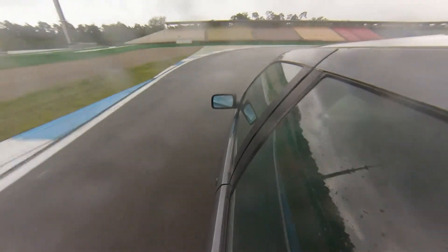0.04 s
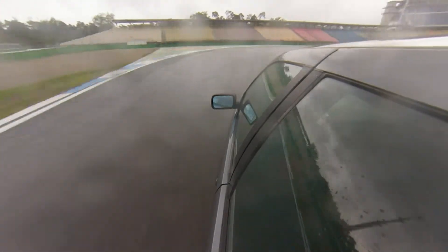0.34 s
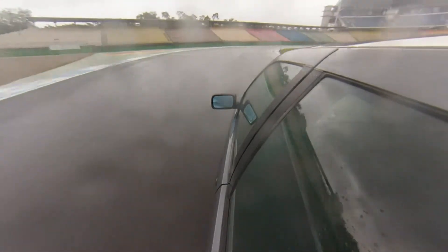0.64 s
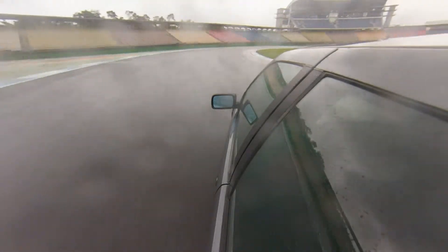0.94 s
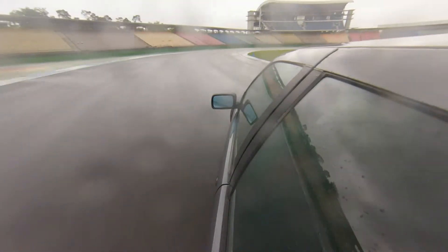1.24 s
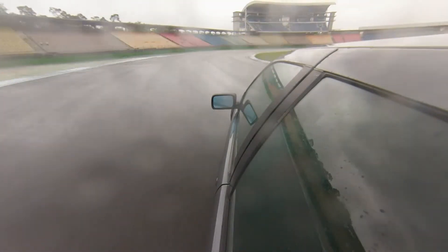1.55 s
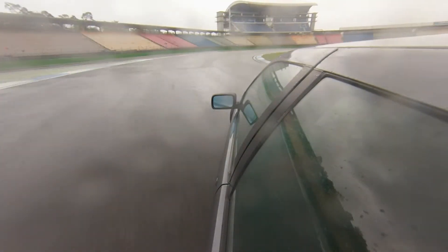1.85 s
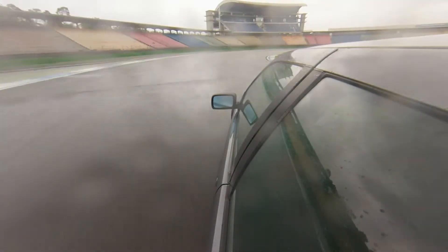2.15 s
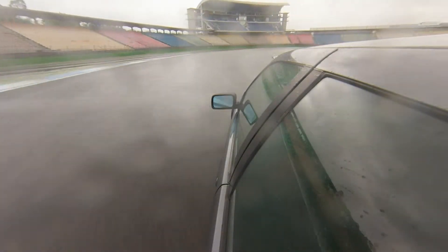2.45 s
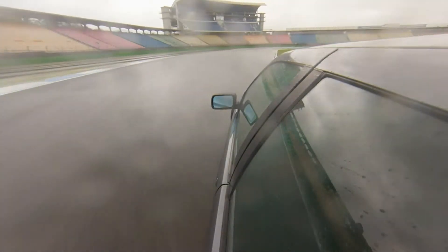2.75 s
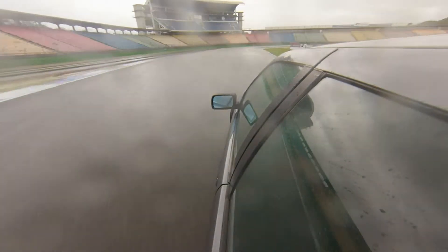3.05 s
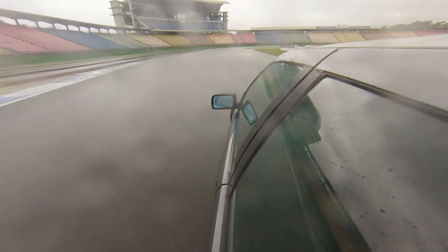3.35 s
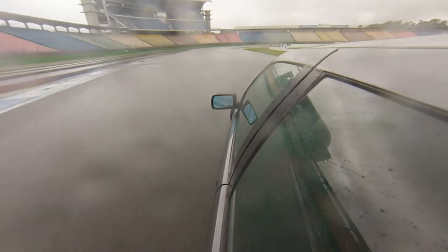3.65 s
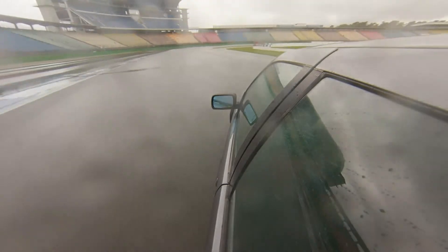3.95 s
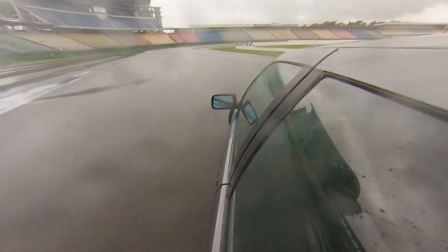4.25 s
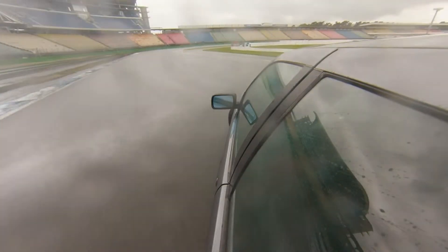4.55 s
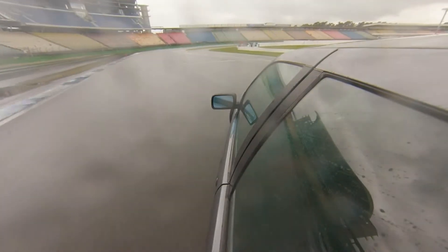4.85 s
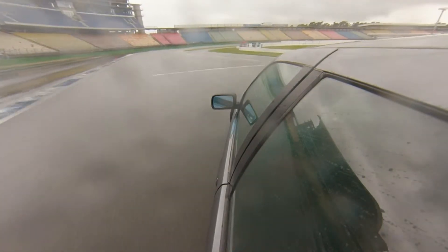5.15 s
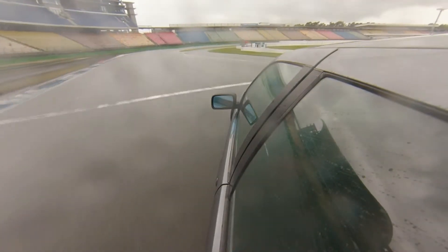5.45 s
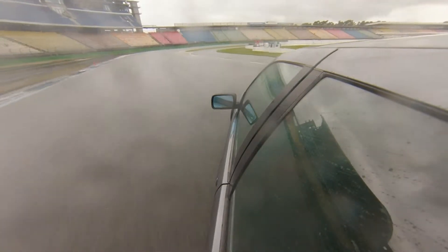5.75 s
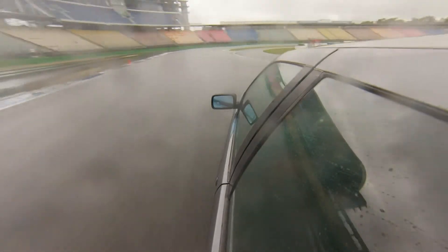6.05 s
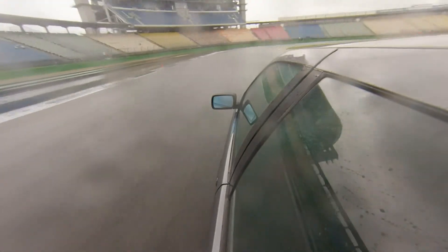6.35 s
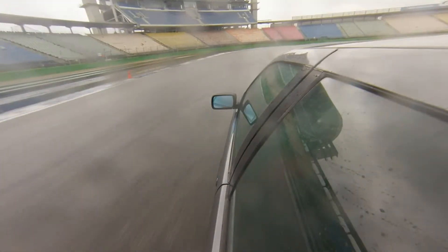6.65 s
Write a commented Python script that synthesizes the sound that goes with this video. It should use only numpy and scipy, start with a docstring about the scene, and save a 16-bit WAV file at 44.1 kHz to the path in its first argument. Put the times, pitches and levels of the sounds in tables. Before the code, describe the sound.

A car slides round a wet racetrack, heard from its outside flank, where heavy wind dominates with a low flutter and repeated rushing gusts. The engine runs hard at a nearly steady pitch underneath, joined within the first second by uneven tyre scrub. Fine spray and sharp little water ticks sit on top. The scrub stops late on, followed by one brief squeal as the engine swells again.

```python
"""Wind throbs and rushes over a small case mounted on the flank of a car drifting round a wet track.
Eddies shed by the mount make the deep throb, which breaks up whenever a gust rises. One airflow,
a stream with gusts on top, drives the rumble, the rush through the housing and the hiss of spray.
Underneath, the engine is held at high revs, the tyres stick and slip into a scrub and a late squeal,
and drops tick on the case."""
import sys
import numpy as np
from scipy import signal
from scipy.fft import rfft, irfft, next_fast_len
from scipy.io import wavfile
from scipy.ndimage import uniform_filter1d

SR = 44100
rng = np.random.default_rng(int(sys.argv[2]) if len(sys.argv) > 2 else 0)


def wav_out(sig):
    """Save sig, one row per channel (or a flat mono array), as 16-bit PCM at SR to the path in sys.argv[1]."""
    wavfile.write(sys.argv[1], SR, np.round(np.clip(np.atleast_2d(sig).T, -1, 1) * 32767).astype(np.int16))


N = 300321

# Table levels are relative: the layers add their own gain.
# stream over the housing, strong while the car is sideways: t/s, level/dB
AIR_STREAM = [(0.0, -61.5), (0.3, -53), (0.55, -47), (0.75, -44), (3.9, -40.5), (4.05, -44.5), (4.5, -46),
              (4.85, -40.8), (5.85, -46), (6.0, -48.5), (6.5, -53), (6.81, -42)]
# gusts on top of the stream: peak t/s, level/dB, rise/s, fall/s, extra bass/dB
AIR_GUSTS = [(0.119, -47.5, 0.095, 0.088, 3.5), (0.826, -33, 0.089, 0.087, -1.5),
             (1.153, -39.5, 0.2, 0.14, -3), (1.577, -36.5, 0.12, 0.016, -1.5),
             (1.932, -30.5, 0.15, 0.014, -1), (2.25, -35.5, 0.123, 0.025, 1), (2.514, -32, 0.11, 0.012, 0),
             (2.64, -37, 0.088, 0.014, 0.5), (2.797, -39, 0.069, 0.022, -0.9),
             (3.058, -34.5, 0.086, 0.028, 0), (3.469, -33, 0.13, 0.03, 0.2), (3.605, -33, 0.049, 0.053, -1),
             (3.83, -42.5, 0.054, 0.099, 3.5), (4.19, -42, 0.069, 0.17, 0.5), (4.6, -38, 0.045, 0.091, 3),
             (4.745, -32.5, 0.095, 0.033, 3.5), (5.051, -32.9, 0.08, 0.088, 0.5),
             (5.272, -35.5, 0.041, 0.158, -1.5), (5.593, -33, 0.055, 0.087, -1.5),
             (5.881, -37, 0.044, 0.026, 2.5), (6.371, -46.5, 0.063, 0.0089, 6),
             (6.811, -41, 0.058, 0.14, 3.5)]
# rate at which eddies peel off the mount: t/s, f/Hz
EDDY_RATE = [(0, 36.15), (.7, 38.87), (.95, 36.65), (1.6, 37.86), (2.25, 40.2), (2.6, 37), (3.1, 36),
             (3.55, 39.16), (4.1, 37.5), (4.4, 38.43), (4.85, 37.2), (5.2, 33.47), (5.4, 35.44),
             (5.65, 39.86), (5.9, 39.6), (6.15, 36.92), (6.81, 34.77)]
# spectrum of the deep turbulence: f/Hz, level/dB
RUMBLE_SPECTRUM = [(25, -7), (45, -2.5), (65, 0), (82, -3), (103, -1), (125, -3.5), (150, -6), (185, -17.5),
                   (260, -23.5), (400, -37.5)]
# spectrum of gusts roaring against the case: f/Hz, level/dB
ROAR_SPECTRUM = [(150, 0), (220, 2.5), (290, -0.5), (380, -6.5), (460, -1), (540, -10.5), (700, -11.5),
                 (950, -9.5), (1400, -15.5), (2200, -22)]
# spectrum of the spray's hiss: f/Hz, level/dB
HISS_SPECTRUM = [(2500, -6), (4000, -13), (5600, -3.5), (6500, 2.5), (7600, -4), (8900, -9.5), (9800, -4.5),
                 (10400, -9.5), (11300, -4.5), (13000, -14), (15500, -39)]
# spectrum of air rushing through the housing: f/Hz, level/dB
RUSH_SPECTRUM = [(300, -4), (600, -9), (900, -5), (1500, -3.5), (2500, -2.5), (3100, -11.5), (4200, -10),
                 (5600, -19.5), (9000, -30)]
# air resonances of the housing: f/Hz, width/Hz, level/dB
HOUSING_MODES = [(455.6, 33, 2), (955, 120, -6), (1232, 120, -1), (1462, 396, 0), (2080, 470, -5.5),
                 (2426, 400, -2), (3526, 330, -10.5), (5010, 274, -6)]
# spectrum of the air at each microphone port: f/Hz, level/dB
PORT_SPECTRUM = [(40, -15), (130, -11.5), (300, -2), (700, -5.5), (1100, -24.5), (2500, -27), (7000, -21),
                 (15000, -27.5)]
# mount resonances that the road keeps humming: f/Hz, width/Hz, level/dB
MOUNT_MODES = [(463, 8.2, -55.5), (2320, 880, -55.5), (5040, 240, -58.5)]
# engine on the throttle through the slide, lifted, then opened again: t/s, firing f/Hz, level/dB
ENGINE_REVS = [(0, 141.4, -46), (.45, 134.2, -38.5), (.8, 140.1, -33.5), (1.3, 150, -40),
               (1.55, 143.1, -32), (2.25, 146.9, -28.5), (2.6, 139, -31.5), (3.1, 145.7, -40.5),
               (3.5, 152, -32), (3.9, 147.5, -30.5), (4.1, 144, -42), (4.5, 141.2, -37.5),
               (4.7, 139.8, -34), (5.65, 149.4, -34.5), (6.05, 136.7, -45), (6.3, 140.1, -39),
               (6.6, 149, -31.5), (6.81, 144.2, -26.5)]
# handfuls of spray thrown at the case: start t/s, length/s, level/dB
SPRAY_SPATTERS = [(.03, .06, -47), (5.898, .04, -43), (6.031, 0.074, -39.5), (6.291, 0.033, -46),
                  (6.413, 0.017, -49)]
# modes of the case under a drop: f/Hz, level/dB, t60/s
CASE_MODES = [(4650, -11, 0.019), (6440, -11.5, 0.0084), (7740, -12.5, 0.0077), (9500, -22, 0.0081),
              (10880, -8.5, 0.003), (12000, -16, 0.0058)]
# air buffeting the flank while the car runs straighter: start t/s, length/s, starting f/Hz, level/dB
SIDE_BUFFETS = [(0.141, 0.28, 54.9, -16), (6.33, 0.133, 58.4, -18)]
# single drops hitting the case: t/s, level/dB, ring f/Hz
DROP_HITS = [(0.2798, -42, 6370), (0.7635, -22.5, 5100), (1.27, -34, 6630), (1.6833, -32, 6290),
             (2.0771, -33, 4060), (2.2498, -28.5, 4070), (2.3347, -32.5, 6230), (2.5083, -36, 6850),
             (3.4158, -23, 6240), (3.7173, -36.5, 6670), (4.8465, -37, 6690), (5.3675, -27, 7260),
             (5.8804, -29, 5900), (6.126, -28.5, 4950), (6.221, -44, 6130), (6.311, -43, 6600),
             (6.4653, -48, 6370), (6.71, -41, 12970)]
# sliding rear tyres: t/s, stick-slip f/Hz, level/dB
TYRE_SCRUB = [(.3, 1238, -63), (.48, 1304, -40), (.7, 1284, -44.5), (.83, 1288, -29), (.95, 1330, -38.5),
              (1.12, 1322, -30), (1.3, 1390, -38.5), (1.5, 1430, -37), (1.9, 1408, -45), (2.2, 1427, -34.5),
              (2.5, 1446, -33.5), (2.9, 1421, -41), (3.4, 1462, -32.5), (4.0, 1448, -44),
              (4.7, 1427, -37.5), (5.9, 1450, -39.5), (6.05, 1432, -70)]
# one tyre finds grip and sings: t/s, f/Hz, level/dB
TYRE_SQUEAL = [(6.25, 1096, -57), (6.31, 1112, -51), (6.37, 1151, -41), (6.45, 1230, -50),
               (6.53, 1255, -48), (6.6, 1245, -45), (6.68, 1240, -77)]


def from_db(db):
    """Decibels to gain."""
    return 10 ** (np.asarray(db) / 20)


def rms_one(x):
    """Scale to rms 1."""
    return x / np.sqrt(np.mean(x ** 2) + 1e-20)


def automation(rows):
    """Breakpoints to one curve per column after the time, sample by sample."""
    times, *columns = np.transpose(rows)
    return [np.interp(np.arange(N) / SR, times, column) for column in columns]


def shaped_noise(colour):
    """Noise through the EQ curve colour(hz); rms 1."""
    size = next_fast_len(N)
    hz = np.arange(size // 2 + 1) * SR / size
    white = rfft(rng.standard_normal(size))
    return rms_one(irfft(white * colour(hz), size)[:N])


def drift(rate_hz):
    """Random modulator that rolls off above rate_hz; rms 1."""
    return shaped_noise(lambda hz: 1 / (1 + (hz / rate_hz) ** 4))


def broad_noise(spectrum):
    """Noise bed with a smooth spectrum, rolled off beyond both ends."""
    f, db = np.transpose(spectrum)

    def colour(hz):
        gain = from_db(np.interp(np.log(hz + 1e-9), np.log(f), db))
        low_cut = np.minimum(hz / f[0], 1) ** 2
        return gain * low_cut / (1 + (hz / f[-1] / 2) ** 2)
    return shaped_noise(colour)


def resonant_noise(modes):
    """Noise in steep-sided resonances."""
    def colour(hz):
        peaks = [from_db(db) / (1 + ((hz - f) / (0.75 * width)) ** 2) for f, width, db in modes]
        return np.sqrt(sum(peak ** 2 for peak in peaks))
    return shaped_noise(colour)


def wavering_phase(hz, jitter, rate_hz):
    """Running phase of a pitch that wanders by the fraction `jitter`."""
    return 2 * np.pi * np.cumsum(hz * (1 + jitter * drift(rate_hz))) / SR


def with_octave(phase, octave_db):
    """A sine with its octave layered on top."""
    return np.sin(phase) + from_db(octave_db) * np.sin(2 * phase)


def ring(clicks, hz, t60):
    """Each click sets a decaying sine ringing."""
    decay, step = from_db(-60 / (t60 * SR)), 2 * np.pi * hz / SR
    return signal.lfilter([0, np.sin(step)], [1, -2 * decay * np.cos(step), decay ** 2], clicks + 1e-18)


def airflow(bass=False, gust_shape=1.475):
    """Gusts swell and die, adding power to the stream; returns the total and the gusts' lift in dB."""
    stream_db, = automation(AIR_STREAM)
    t = np.arange(N) / SR
    power = from_db(stream_db) ** 2
    for peak_s, db, rise_s, fall_s, bass_db in AIR_GUSTS:
        from_peak = np.abs((t - peak_s) / np.where(t < peak_s, rise_s, fall_s))
        swell = np.exp(-from_peak ** gust_shape)   # shape 1 is a pointed peak, 2 a round bell
        power += from_db(db + bass * bass_db) ** 2 * swell
    flow_db = 10 * np.log10(power)
    return flow_db, flow_db - stream_db


def eddy_throb(flow_db, level_db=-15.5, uneven_db=2.5, duck_db_per_db_per_s=0.075,
               panel_hz=102, panel_width_hz=5):
    """Eddies peel off the mount almost regularly; their throb ducks while the airflow rises."""
    hz, = automation(EDDY_RATE)
    phase = wavering_phase(hz, jitter=0.0748, rate_hz=16.22)
    rise_db_per_s = uniform_filter1d(np.maximum(np.gradient(flow_db) * SR, 0), size=SR // 50)
    # in a strong stream the body panel booms whenever the third harmonic meets its resonance
    drive = from_db(-11 + 0.42 * (flow_db - flow_db.mean()))
    boom = drive / (1 + ((3 * hz - panel_hz) / panel_width_hz) ** 2)
    wave = with_octave(phase, octave_db=-23) - boom * np.sin(3 * phase)
    duck_db = duck_db_per_db_per_s * rise_db_per_s
    return from_db(level_db - duck_db + uneven_db * drift(19.7)) * rms_one(wave)


def air_layer(spectrum, flow_db, level_db, follows, lumpy_db):
    """Noise that rides a share of the airflow's swing, with lumps of its own."""
    swing_db = follows * (flow_db - flow_db.mean())
    return from_db(level_db + swing_db + lumpy_db * drift(18.6)) * broad_noise(spectrum)


def wind(flow_db, housing_db=3.0, rush_db=-1.0, flutter_db=0.96):
    """Turbulence rumbles, roars, rushes and carries spray; all but the rumble flutters together."""
    bass_flow_db, _ = airflow(bass=True)
    rumble = air_layer(RUMBLE_SPECTRUM, bass_flow_db, level_db=-28.0, follows=0.82, lumpy_db=2.5)
    roar = air_layer(ROAR_SPECTRUM, bass_flow_db, level_db=-40.5, follows=0.96, lumpy_db=2.5)
    hiss = air_layer(HISS_SPECTRUM, flow_db, level_db=-51.0, follows=0.96, lumpy_db=0.6)
    housing = from_db(flow_db + housing_db) * resonant_noise(HOUSING_MODES)
    rush = from_db(flow_db + rush_db) * broad_noise(RUSH_SPECTRUM)
    return rumble + from_db(flutter_db * drift(40)) * (roar + housing + rush + hiss)


def port_air(level_db=-58.0):
    """The two microphone ports sit close together: only this faint air gives stereo width."""
    return from_db(level_db) * np.array([broad_noise(PORT_SPECTRUM), broad_noise(PORT_SPECTRUM)])


def road_hum(flow_db, follows=0.22, waver_db=2.0):
    """The rolling car keeps the mount humming, a little louder as the airflow builds in the slide."""
    hum = sum(from_db(db) * resonant_noise([(hz, width, 0)]) for hz, width, db in MOUNT_MODES)
    return from_db(follows * (flow_db - flow_db.mean()) + waver_db * drift(5.9)) * hum


def engine(trim_db=-1.0, rough_db=3.0):
    """Exhaust note: the firing rate, with half orders from unequal cylinders."""
    hz, db = automation(ENGINE_REVS)
    phase = wavering_phase(hz, jitter=0.0242, rate_hz=24.0)
    orders_db = {0.5: -1, 1: 4.5, 1.5: -7, 2: -20, 2.5: -19, 3: -16.5}
    note = sum(from_db(order_db + rough_db * drift(34)) * np.sin(order * phase)
               for order, order_db in orders_db.items())
    return from_db(db + trim_db) * rms_one(note)


def spray_patter(per_s=110, click_db=-57, spread_db=5.0, spatter_per_s=900):
    """Fine spray patters at random on the case's modes, densely during a spatter."""
    t = np.arange(N) / SR
    hits = rng.random(N) < per_s / SR
    sizes = from_db(click_db + spread_db * np.minimum(rng.exponential(1, N), 3))
    thrown = sum(from_db(db) * ((t > start) & (t < start + length))
                 for start, length, db in SPRAY_SPATTERS)
    clicks = hits * sizes + thrown * (rng.random(N) < spatter_per_s / SR)
    return sum(from_db(db) * ring(clicks * rng.standard_normal(N), hz, t60) for hz, db, t60 in CASE_MODES)


def add_buffets(throb, attack_s=0.026, release_s=0.15, glide_hz_per_s=27, duck_db=-5):
    """Air beats on the flank: each buffet swells, creeps up in pitch and fades, ducking the throb."""
    for start, length, hz, db in SIDE_BUFFETS:
        age = np.arange(N) / SR - start
        envelope = np.clip(age / attack_s, 0, 1) * np.clip(1 - (age - length) / release_s, 0, 1)
        phase = wavering_phase(hz + glide_hz_per_s * age, jitter=0.048, rate_hz=25)
        buffet = rms_one(with_octave(phase, octave_db=-21))
        throb = throb * from_db(duck_db * envelope) + from_db(db) * envelope * buffet
    return throb


def drop_ticks(trim_db=-3.0, ping_db=-2.5, ping_t60=0.0047, splash_s=0.00039, low_cut_hz=3200):
    """Each drop splashes briefly on the case, which rings along with a ping of the drop's own."""
    ticks, size = np.zeros(N + SR), SR // 40
    splashes = rng.standard_normal((len(DROP_HITS), size)) * np.exp(-np.arange(size) / (splash_s * SR))
    for (start, db, ping_hz), splash in zip(DROP_HITS, splashes):
        modes = CASE_MODES + [(ping_hz, ping_db, ping_t60)]
        tick = sum(from_db(mode_db) * rms_one(ring(splash, hz, t60)) for hz, mode_db, t60 in modes)
        at, first_4_ms = int(start * SR), tick[:SR // 250]
        ticks[at:at + size] += from_db(db + trim_db) * tick / first_4_ms.std()
    low_cut = signal.butter(2, low_cut_hz, "high", fs=SR, output="sos")
    return signal.sosfilt(low_cut, ticks[:N] + 1e-18)


def tyre(curve, trim_db, jitter, rough_db, octave_db):
    """Tread sticks and slips at a wandering rate, in uneven bursts."""
    hz, db = automation(curve)
    phase = wavering_phase(hz, jitter, rate_hz=109.4)
    tone = with_octave(phase, octave_db) * from_db(rough_db * drift(106))
    return from_db(db + trim_db) * rms_one(tone)


def tyre_scrub(gust_db, follows=0.51):
    """Two driven tyres slide at the same speed, one more coarsely; both swell with the gusts."""
    smooth = tyre(TYRE_SCRUB, trim_db=-4.5, jitter=0.04, rough_db=4.5, octave_db=-32)
    coarse = tyre(TYRE_SCRUB, trim_db=-13.0, jitter=0.085, rough_db=4.5, octave_db=-11.5)
    return (smooth + coarse) * from_db(follows * gust_db)


def scene():
    """Wind in front, the car beneath it, spray on top."""
    flow_db, gust_db = airflow()
    scrub = tyre_scrub(gust_db)
    squeal = tyre(TYRE_SQUEAL, trim_db=1.5, jitter=0.021, rough_db=2.8, octave_db=-13)
    air = add_buffets(eddy_throb(flow_db)) + wind(flow_db) + port_air()
    car = road_hum(flow_db) + engine() + scrub + squeal
    return air + car + drop_ticks() + spray_patter()


def record(dry, cutoff_hz=15300):
    """A steep high cut on the whole mix."""
    return signal.sosfilt(signal.ellip(10, 0.1, 80, cutoff_hz, fs=SR, output="sos"), dry)


dry = scene()
out = record(dry)
wav_out(out)
```